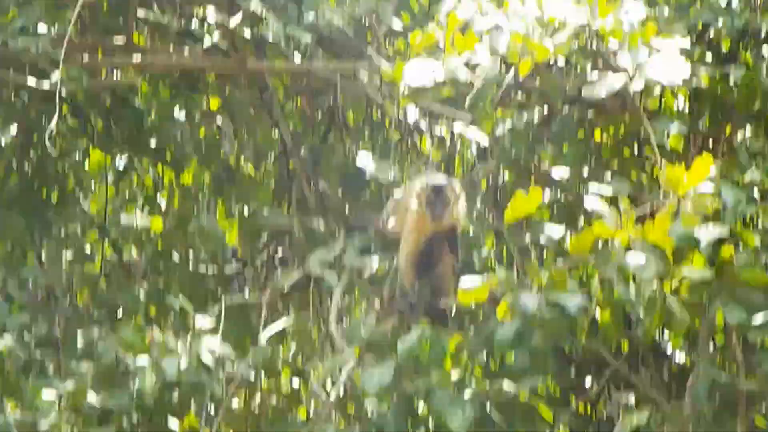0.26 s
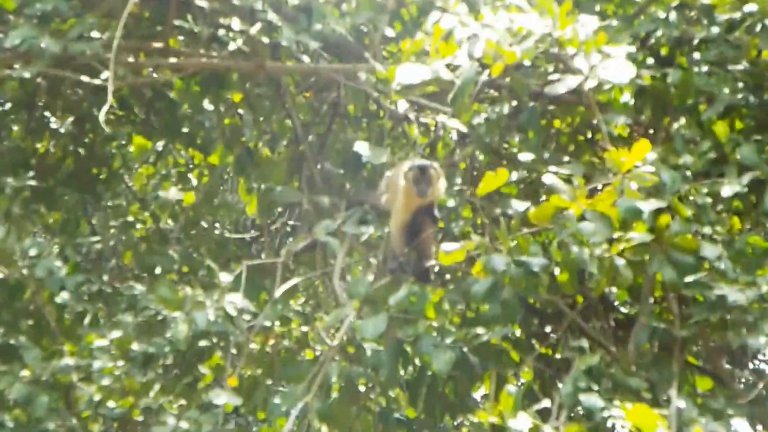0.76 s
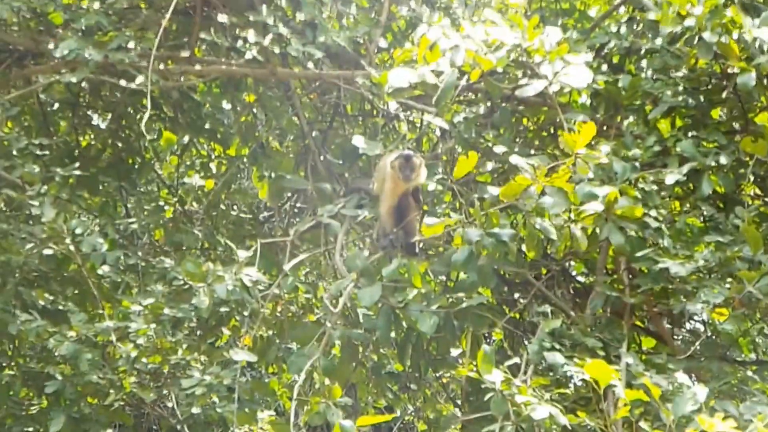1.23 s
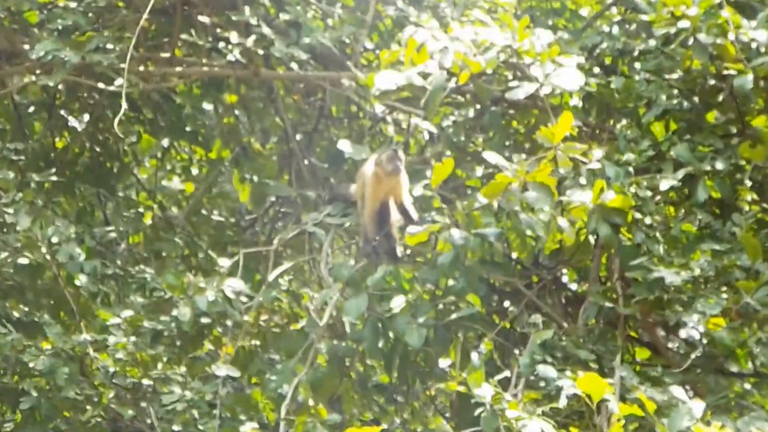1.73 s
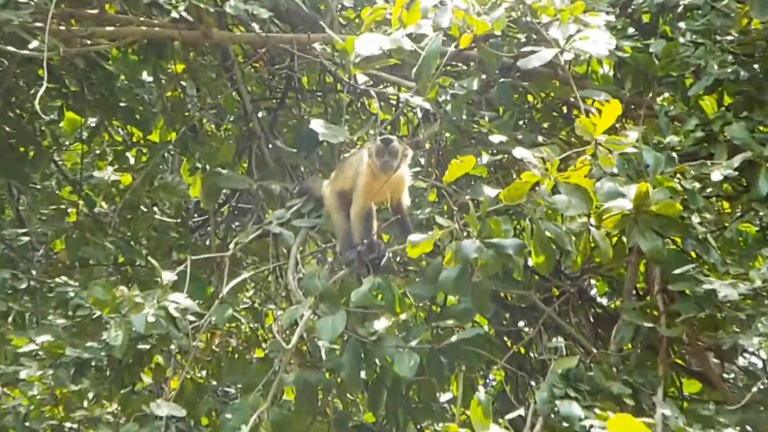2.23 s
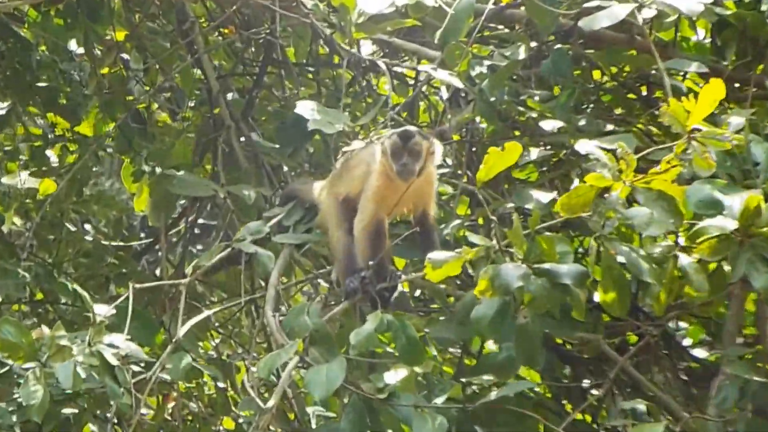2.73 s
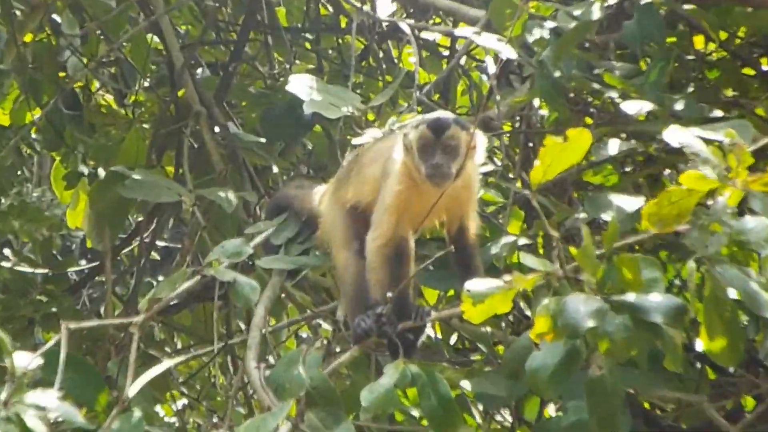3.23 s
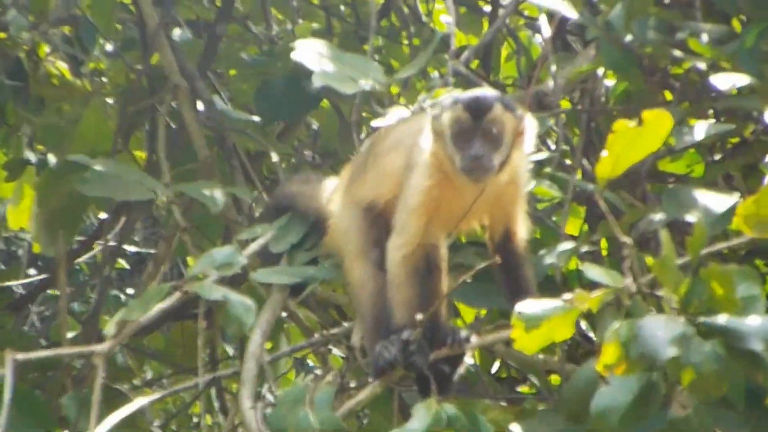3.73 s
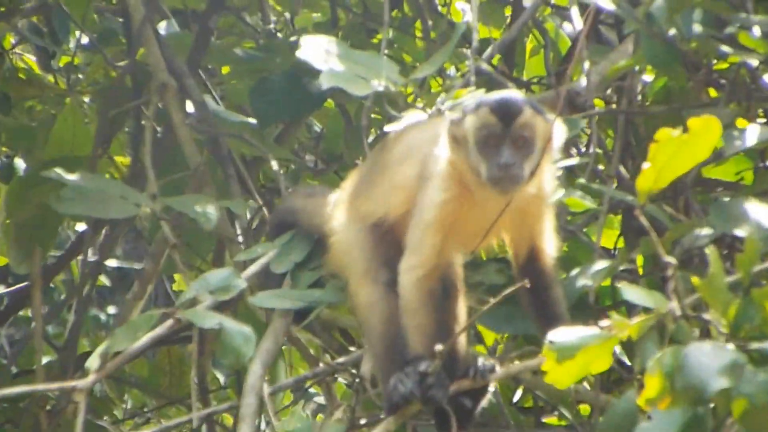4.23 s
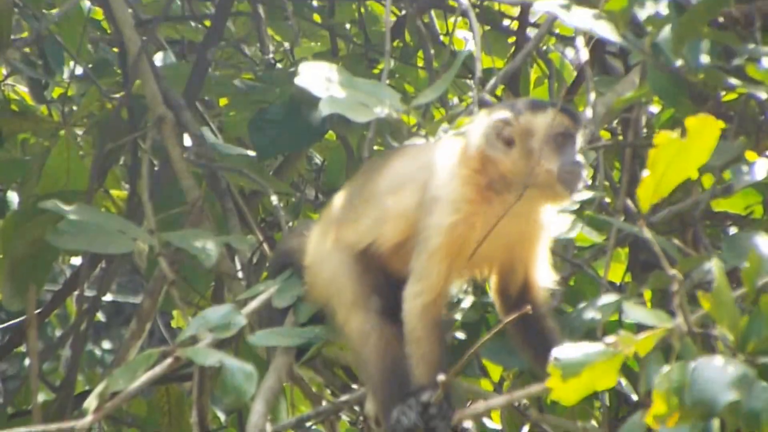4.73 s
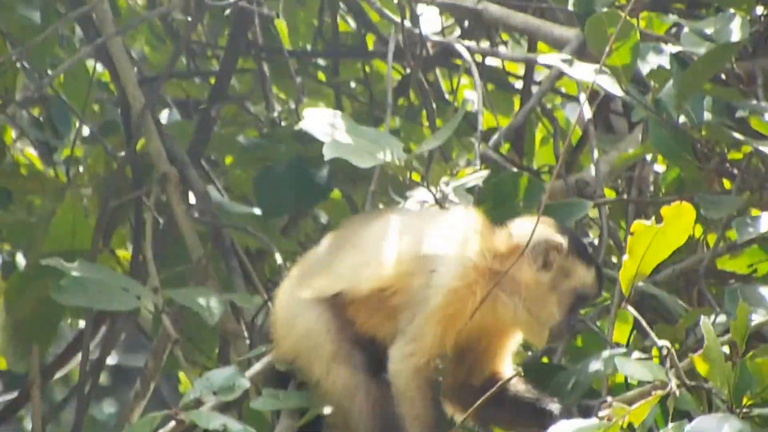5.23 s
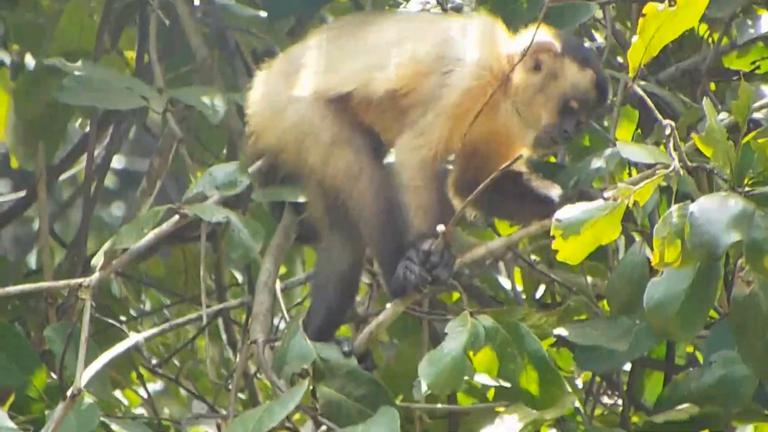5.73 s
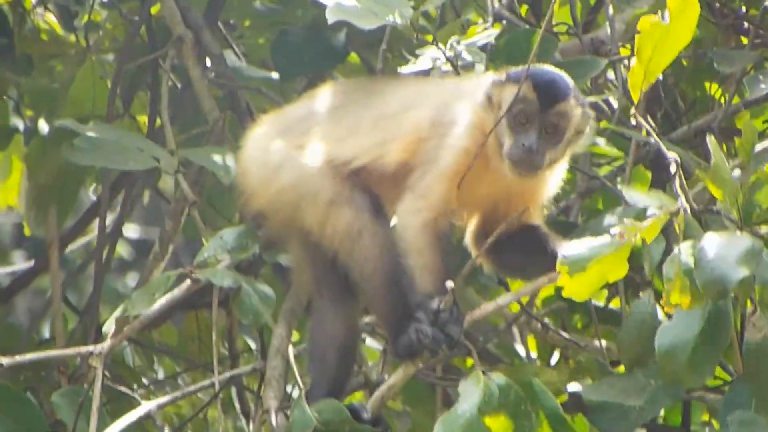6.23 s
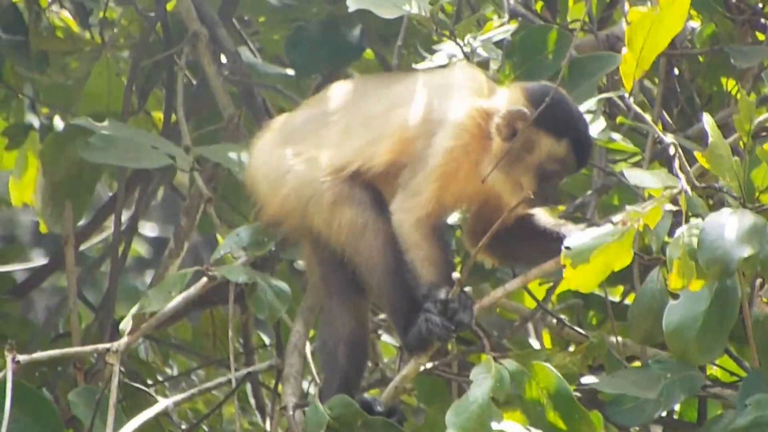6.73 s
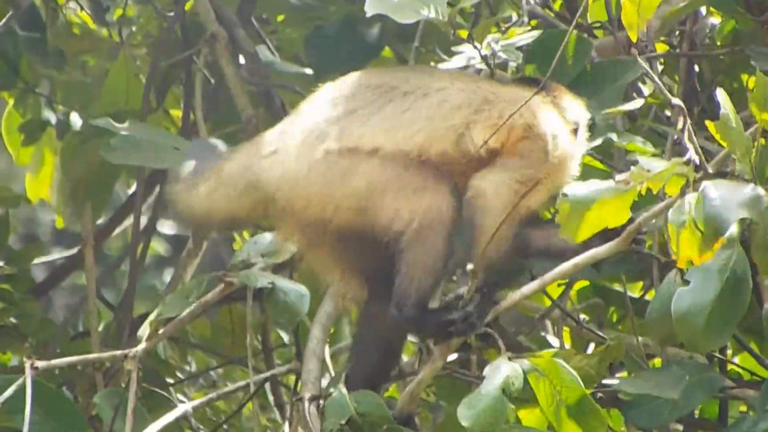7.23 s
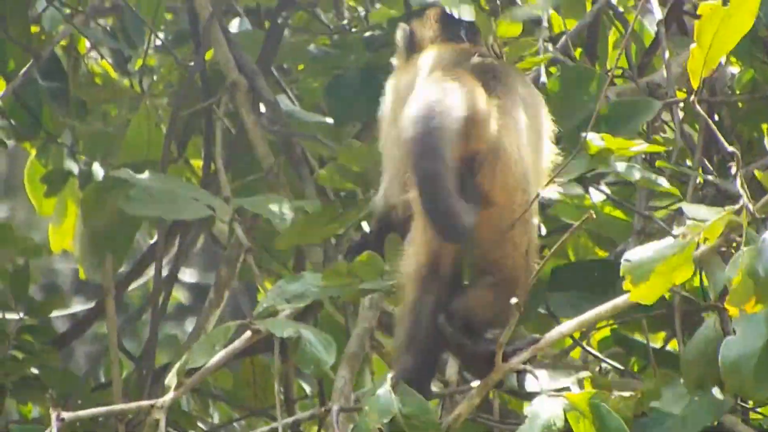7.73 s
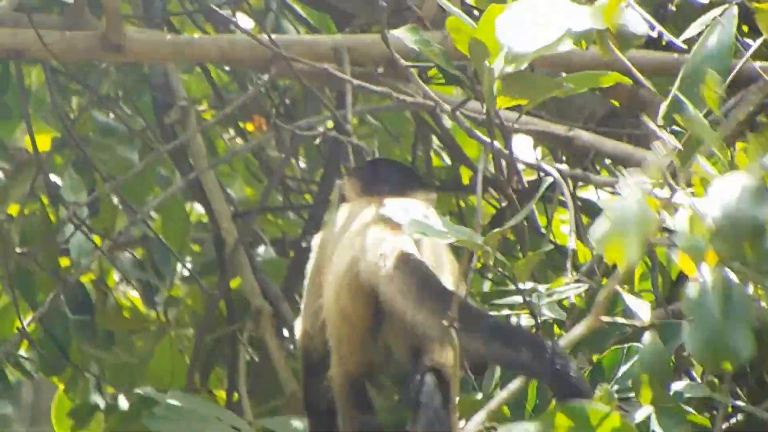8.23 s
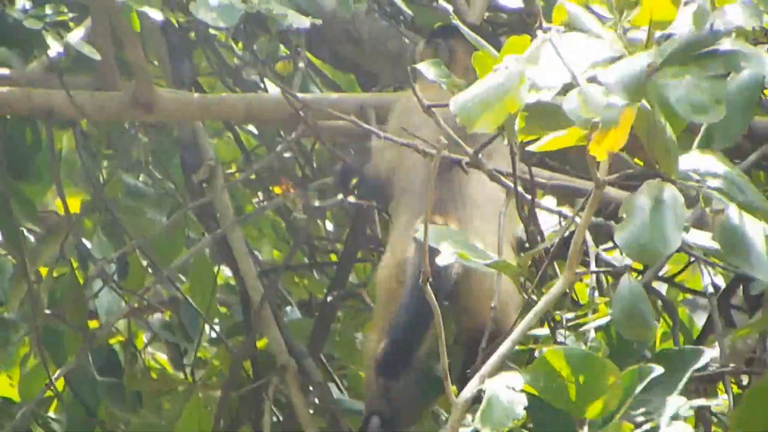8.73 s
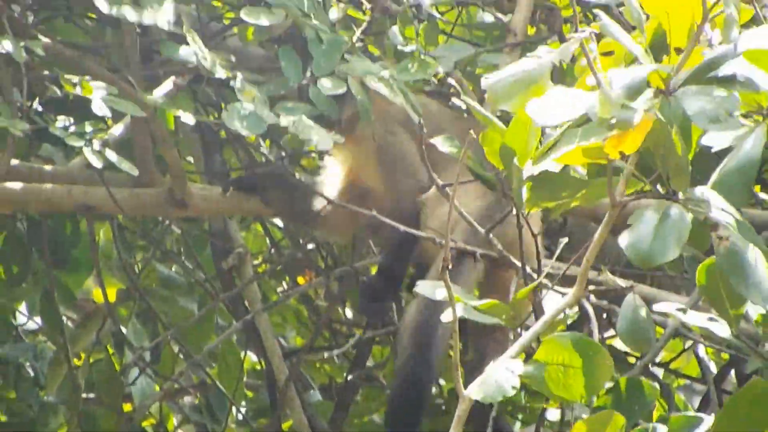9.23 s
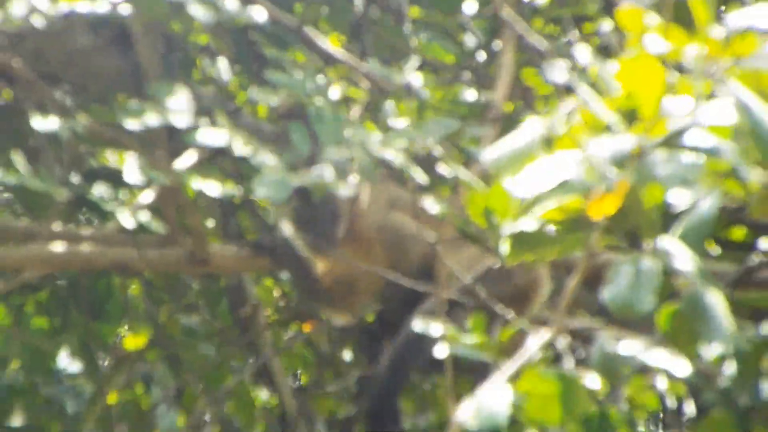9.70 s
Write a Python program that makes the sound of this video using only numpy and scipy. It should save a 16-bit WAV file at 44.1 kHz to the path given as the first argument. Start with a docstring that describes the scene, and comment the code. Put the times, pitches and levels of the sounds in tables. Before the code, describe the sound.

In leafy trees, arching monkey chirps repeat ever faster and shorter while a camera's zoom motor whirs and throbs close to the microphone. A very loud, dry click follows the run. Then brief whoops flick upward, soft peeps scatter, and a thin quavering whistle sinks away. The motor returns at the end. Steady soft leaf and insect noise lies underneath, with natural forest echo.

```python
"""Leafy trees where monkeys call: a quickening run of arching chirps, four rising whoops, a thin held whistle, peeps.
Calls are gliding sines; random echoes scatter them. Shaped noise makes leaves and insects, over a low sine hum.
A camera's zoom motor whirs in bursts: gear-whine sines and throbbing noise. Its controls click: decaying
sine knocks, noise cracks and case ring. A limiter ducks the gain on peaks above full scale."""
import sys
import numpy as np
from scipy import signal
from scipy.fft import rfft, irfft, next_fast_len
from scipy.io import wavfile
from scipy.ndimage import uniform_filter1d, minimum_filter1d, map_coordinates

SR = 44100
rng = np.random.default_rng(int(sys.argv[2]) if len(sys.argv) > 2 else 0)


def transcribe(u):
    """Save the signal u as a 16-bit wav file named by the first command-line argument.

    u: samples, shape (n,) or (channels, n), limited to [-1, 1]; the rate is SR.
    q: integer samples, one column per channel.
    """
    v = np.clip(np.atleast_2d(u).T, -1, 1)
    q = np.round(v * 32767).astype(np.int16)
    wavfile.write(sys.argv[1], SR, q)


N = 439236
TIME = np.arange(N) / SR

# all call levels: before forest gains

# arching chirps: [start t/s, end t/s, top f/Hz, end f/Hz, level/dB], f before scoop and hook
CHIRPS = [(-.22, 0.066, 2680, 2440, -29), (0.417, 0.749, 2690, 2580, -39.5),
          (1.019, 1.364, 2745, 2573, -40.5), (1.564, 1.944, 2806, 2503, -36.5),
          (2.1, 2.452, 2865, 2437, -37.5), (2.595, 2.918, 2895, 2440, -37), (3.035, 3.288, 2906, 2450, -37),
          (3.383, 3.58, 2927, 2424, -37), (3.653, 3.801, 2894, 2475, -35.5),
          (3.882, 4.009, 2880, 2390, -35), (4.095, 4.21, 2875, 2330, -34.5), (4.29, 4.402, 2890, 2270, -35),
          (4.489, 4.596, 2813, 2350, -37)]
SCOOP, SCOOP_S, SAG_POWER, HOOK, HOOK_S = .3, .0078, 1.5, 0.107, 0.0082  # depths: share of pitch
CATCH_AT, CATCH_WIDTH, CATCH_DB = 0.738, 0.12, -9  # place, width: share of chirp
CHIRP_ATTACK_S, CHIRP_RELEASE_S, CHIRP_FADE_DB, OCTAVE_DB = 0.024, 0.021, -4, -12


def chirps(flutter_db=2.5):
    """Pitch scoops up, sags, hooks down; the fundamental fades and catches while the octave holds."""
    out = np.zeros(N)
    for start, end, top_hz, end_hz, db in CHIRPS:
        t = np.arange(0, end - start, 1 / SR)
        u, left = t / t[-1], t[-1] - t
        scoop_s = SCOOP_S * np.sqrt(t[-1] / 0.191)  # short chirps rise faster
        rise = 1 - SCOOP * np.exp(-t / scoop_s)
        hook = 1 - HOOK * np.exp(-left / HOOK_S)
        hz = (top_hz + (end_hz - top_hz) * u ** SAG_POWER) * rise * hook
        turn = phase(hz * (1 + 0.0037 * drift(len(t), 147)))

        catch = np.exp(-((u - CATCH_AT) / CATCH_WIDTH) ** 2)
        edges = np.minimum(t / CHIRP_ATTACK_S, 1) * np.minimum(left / CHIRP_RELEASE_S, 1)
        first = edges * amp(CHIRP_FADE_DB * u + CATCH_DB * catch)
        voice = 0
        for k, gain in enumerate([first, amp(OCTAVE_DB)], 1):
            voice = voice + gain * amp(flutter_db * drift(len(t), 48.0)) * np.sin(k * turn)
        add(out, start, amp(db) * np.sqrt(2) * voice * fade(t, 0.0015))
    return pan(forest(out, direct_db=-3.5, wet_db=-9.5), side_db=1.0)


# rising whoops: [start t/s, end t/s, knee f/Hz, top f/Hz, level/dB]
WHOOP_CALLS = [(5.893, 5.986, 4160, 4660, -29), (7.145, 7.268, 4230, 5080, -26.5),
               (8.032, 8.186, 3900, 5230, -27), (9.254, 9.408, 3900, 5280, -32)]
WHOOP_START_HZ, FLICK_LEAD_S, FLICK_S = 2710, .023, 0.0047  # lead: before the end


def whoops(swell_db=23, swell_power=2.53, octave_db=-38, scoop=0.1387):
    """A soft slow rise breaks at a knee into a loud upward flick."""
    out = np.zeros(N)
    for start, end, knee_hz, top_hz, db in WHOOP_CALLS:
        t = np.arange(0, end - start, 1 / SR)
        u = t / t[-1]
        flick_at = t[-1] - FLICK_LEAD_S
        flick = 1 / (1 + np.exp((flick_at - t) / FLICK_S))
        hz = WHOOP_START_HZ + (knee_hz - WHOOP_START_HZ) * u + (top_hz - knee_hz) * flick
        hz = hz * (1 - scoop * np.exp(-t / 0.01476))
        effort = np.minimum(t / flick_at, 1) ** swell_power
        turn = phase(hz * (1 + 0.0087 * drift(len(t), 409)))
        voice = np.sin(turn) + amp(octave_db) * np.sin(2 * turn)
        add(out, start, amp(db + swell_db * (effort - 1)) * voice * fade(t, .012))
    return forest(out, direct_db=1.5, wet_db=1.5)


WHISTLE_START_S, WHISTLE_END_S, WHISTLE_DB = 7.46, 9.16, -42.5
WHISTLE_HZ, SINK_HZ_PER_S = 6590, 470
OVERSHOOT_HZ, OVERSHOOT_S, DROOP_HZ, DROOP_S = 449, .035, 388, .07


def whistle(rough=.024, quaver=0.0064, quaver_hz=16, octave_db=-31):
    """A thin, quavering, sinking tone, mostly echo; random dips keep catching it below its pitch."""
    t = np.arange(0, WHISTLE_END_S - WHISTLE_START_S, 1 / SR)
    overshoot_hz = OVERSHOOT_HZ * np.exp(-t / OVERSHOOT_S)
    droop_hz = DROOP_HZ * np.exp((t - t[-1]) / DROOP_S)
    hz = WHISTLE_HZ - SINK_HZ_PER_S * t + overshoot_hz - droop_hz
    catches = rough * (.6 - np.maximum(drift(len(t), 350), 0) ** 2)
    waver = catches + quaver * np.sin(2 * np.pi * quaver_hz * t)
    turn = phase(hz * (1 + waver))
    level = amp(WHISTLE_DB) * envelope(t, attack_s=0.047, hold_s=0.79, fall_db_per_s=10) * fade(t, .03)
    out = np.zeros(N)
    add(out, WHISTLE_START_S, level * (np.sin(turn) + amp(octave_db) * np.sin(2 * turn)))
    return pan(forest(out, direct_db=-9.0, wet_db=-2), side_db=-5)


PEEP_BEND_OCT_PER_S = 1.915


def peep(length_s, hz, glide_oct, db):
    """One short gliding sine; longer peeps arch more."""
    u = np.linspace(-1, 1, int(length_s * SR))
    octaves = glide_oct * u / 2 - PEEP_BEND_OCT_PER_S * length_s * u ** 2
    return amp(db) * np.sin(phase(hz * 2 ** octaves)) * np.sqrt(1 - u ** 2)


# near peeps: [t/s, length/s, f/Hz, glide/octaves, level/dB]
NEAR_PEEPS = [(3.217, 0.025, 7830, 0.73, -43), (3.682, .019, 3400, -.25, -49),
              (3.944, 0.041, 3850, 0.5, -47), (4.357, 0.025, 3720, -.22, -47),
              (4.473, 0.015, 8300, .2, -50), (4.476, 0.02, 5860, 0.06, -42), (4.802, 0.075, 4290, .2, -47),
              (4.881, .09, 4370, .08, -46), (7.368, .078, 2260, -0.33, -43.5),
              (7.465, 0.039, 3660, -0.75, -43), (7.47, .05, 8000, -0.3, -55.5),
              (7.473, 0.038, 2030, -0.11, -47), (7.529, 0.021, 3430, -0.42, -46),
              (7.719, 0.024, 5840, 0.1, -38), (7.86, .04, 4280, .03, -44.5),
              (8.462, 0.066, 2034, -0.14, -42.5), (9.355, .072, 2320, -0.04, -43.5)]
# left over right, shared by peeps and wash: [f/Hz, level/dB]
FOREST_BALANCE = [(60, -1.5), (110, -2), (200, 0.5), (380, 2), (700, -1.5), (1290, 2.5), (2380, 3.5),
                  (4400, 1.5), (8120, -7), (15000, 0)]
# far peeps, at random in this stretch
FAR_FROM_S, FAR_TO_S, FAR_HZ, FAR_LENGTH_S, FAR_DB = 4.85, 9.1, 3430, .09, -53


def peeps(count=12, spread_oct=.16, glide_oct=0.204):
    """Near peeps are clear, far ones mostly echo; the highest lean right."""
    near, far = np.zeros((2, N))
    for s, *call in NEAR_PEEPS:
        add(near, s, peep(*call))
    for k, (late, pitch, glide) in enumerate(2 * rng.random((count, 3)) - 1):
        s = FAR_FROM_S + (FAR_TO_S - FAR_FROM_S) * (k + .5 + late / 2) / count
        add(far, s, peep(FAR_LENGTH_S, FAR_HZ * 2 ** (spread_oct * pitch), glide_oct * glide, FAR_DB))
    echoed = forest(near, direct_db=-1.0, wet_db=-2) + forest(far, direct_db=-15, wet_db=-3)
    return balanced(echoed, FOREST_BALANCE)


# scatter decay: [f/Hz, t60/s]
FOREST_T60 = [(500, .7), (2000, 0.41), (4700, 1.0), (6500, 0.76), (15000, 0.47)]


def forest(x, direct_db, wet_db, same=0.86):
    """Direct sound plus sparse random echoes scattered by trunks and leaves, decaying per frequency."""
    taps = rng.standard_normal((2, SR)) * (rng.random(SR) < 3000 / SR)  # 3000 echoes/s
    taps[1] = same * taps[0] + np.sqrt(1 - same ** 2) * taps[1]
    hz, t, z = signal.stft(taps, SR, nperseg=256)
    near_leaves = 1 + 1.1 * np.exp(-t / 0.011)  # answer first
    decay = amp(-60 * t / read(FOREST_T60, hz)[:, None]) * near_leaves
    tail = signal.istft(z * decay, SR, nperseg=256)[1]
    wet = signal.fftconvolve(x[None], tail / np.linalg.norm(tail[0]), axes=1)[:, :N]
    return amp(direct_db) * x + amp(wet_db) * wet


# zoom runs: [start t/s, end t/s, motor f/Hz, gear turns per s, level/dB, direction 0 out 1 in]
ZOOM_RUNS = [(0.295, 1.163, 364.7, 18, -41, 0), (1.229, 1.434, 366.7, 20, -41, 1),
             (1.794, 3.902, 367.8, 18.5, -41, 1), (9.298, 9.999, 366, 19.8, -41.5, 0)]
# whine partials: [multiple of motor f, level/dB out, level/dB in], before load swing
GEAR_WHINE = [(4.15, -14, -2), (6, -13, -16), (7, -8, -18), (8, -6, -15), (9.75, -15, -2.5), (11, -10, -16),
              (11.8, -2.5, -14), (13, -12, -19)]
# relative gear noise spectra, zooming out and in: [f/Hz, level/dB per Hz]
GEAR_NOISE_OUT = [(100, -55), (220, -28), (360, -13), (800, -1), (1150, -7), (1550, 0), (2000, -4.5),
                  (3300, -11), (4400, 3), (5800, -17), (10800, -29.5), (15000, -48)]
GEAR_NOISE_IN = [(100, -60), (220, -28.5), (500, -17.5), (900, -4), (1200, -7), (1550, 0), (2000, -5),
                 (3000, -7.5), (4400, -1), (5700, -16.5), (10800, -34), (15000, -42)]
# camera case modes, shared with the clicks: [f/Hz, width/Hz, lift/dB]
CASE_MODES = [(822, 36, 6.5), (1530, 150, 4), (3640, 245, 5.5), (4360, 290, 1), (7150, 220, 6),
              (8830, 470, 5.5), (10800, 400, 7)]
WOBBLE, JITTER, LOAD_DB = .06, .007, 4.5  # first two: share of motor speed


def zoom_motor(throb_db=1, grind_db=-2.0):
    """A gear binds once a turn: the whine sags, swells as it pulls free, and gear noise throbs."""
    out = np.zeros((2, N))
    for start, end, motor_hz, turns_per_s, db, inward in ZOOM_RUNS:
        t = np.arange(0, end - start, 1 / SR)
        inward = int(inward > .5)
        gear = phase(turns_per_s * (1 + 0.0295 * drift(len(t), 7.89)))
        bind = np.cos(gear) - .2 * np.cos(2 * gear) + .2 * np.sin(2 * gear)
        load_db = LOAD_DB * (np.cos(gear - 1.1) - .6)
        shaft = phase(motor_hz * (1 - WOBBLE * bind + JITTER * drift(len(t), 350)))
        whine = 0
        for k, *levels in GEAR_WHINE:
            whine = whine + amp(levels[inward] + load_db + 2.0 * drift(len(t), 90)) * np.sin(k * shaft)
        throb = amp(grind_db + throb_db * np.sin(gear + 0.11) + 0.59 * drift(len(t), 200))
        grind = noise(len(t), [GEAR_NOISE_OUT, GEAR_NOISE_IN][inward], CASE_MODES) * throb
        add(out, start, amp(db) * (whine + grind) * fade(t, 0.0059))
    # left over right: f/Hz, level/dB
    return balanced(out, [(300, 1), (800, -0.5), (1400, 11.0), (2500, 12.5), (4400, 4.5), (8000, -4.0),
                          (15000, -11)])


# camera controls: [t/s, level/dB, f/Hz, decay/s], level before the mix of knock, crack and ring
CONTROL_CLICKS = [(.067, -6.5, 1530, 0.0014), (.26, 4, 1860, 0.0008), (0.3157, -17, 1455, 0.0039),
                  (0.3229, -22, 1600, .0045), (.399, -30, 995, .008), (.925, -27, 1620, 0.0036),
                  (1.155, -24, 1470, 0.0021), (1.1825, -9.5, 1350, .0024), (1.231, -23, 1520, 0.0029),
                  (1.253, -21, 1560, 0.0041), (1.257, -33.5, 686, 0.012), (1.33, -32.5, 810, 0.0058),
                  (1.366, -25, 1460, 0.0029), (4.038, -36, 1070, 0.0044), (4.191, -34.5, 1560, 0.0034),
                  (4.5901, 21.5, 1955, 0.00092), (4.77, -34, 1180, 0.0039), (5.159, -34, 1430, 0.003),
                  (5.821, -31, 1380, 0.0038), (7.83, -36.5, 1040, 0.0035), (7.921, -30, 1080, 0.0027),
                  (9.299, -29.5, 1590, 0.0035), (9.326, -25.5, 1510, 0.0049), (9.39, -29.5, 1430, 0.007),
                  (9.6398, -18.5, 1446, 0.0021), (9.7361, -17.5, 1630, 0.0018)]
# relative spectra of crack and case ring: [f/Hz, level/dB per Hz]
CRACK_SPECTRUM = [(60, -53), (500, -36), (2500, 10), (5000, 8.5), (9000, -11), (12000, -13), (15000, -23)]
RING_SPECTRUM = [(40, -43), (200, -33), (500, -11), (1000, 0), (1500, 5), (2400, -5.5), (5000, -17),
                 (15000, -58)]
# at 1 ms decay, then per octave of decay
CRACK_DB, CRACK_DB_PER_OCT, RING_DB, RING_DB_PER_OCT, RING_MAX_DB = -7.5, -5.5, -25.5, 11, 1.5
# random ticks of the hand on the case
TICKS_PER_S, TICK_DB, TICK_SPREAD_DB, TICK_HZ, TICK_DECAY_S = 2.5, -42.5, 1.5, 1287, 0.0041


def clicks(crack_s=0.00049, ring_s=0.0056, knock_side_db=7.5):
    """Crack, short plastic knock and case ring; quicker clicks crack more and ring less."""
    out, t = np.zeros((2, N)), np.arange(4096) / SR
    ticks = []
    for k, (late, force, pitch) in enumerate(rng.random((int(TICKS_PER_S * N / SR), 3))):
        tick_db = TICK_DB + TICK_SPREAD_DB * (2 * force - 1)
        ticks.append(((k + late) / TICKS_PER_S, tick_db, TICK_HZ * 2 ** (pitch - .5), TICK_DECAY_S))
    for s, db, hz, decay_s in [*CONTROL_CLICKS, *ticks]:
        softness_oct = np.log2(decay_s / .001)
        knock = np.sin(2 * np.pi * hz * t) * np.exp(-t / decay_s) * (1 - np.exp(-t / 0.00039))
        crack_db = CRACK_DB + CRACK_DB_PER_OCT * softness_oct
        crack = amp(crack_db) * noise(len(t), CRACK_SPECTRUM) * np.exp(-t / crack_s)
        ring_db = min(RING_DB + RING_DB_PER_OCT * softness_oct, RING_MAX_DB)
        ring = amp(ring_db) * noise(len(t), RING_SPECTRUM, CASE_MODES) * np.exp(-t / ring_s) * fade(t, 0.0015)
        add(out, s, amp(db) * (pan(knock + ring, knock_side_db) + crack))
    return signal.sosfilt(signal.butter(2, 450, "high", fs=SR, output="sos"), out)  # a small case has no bass


# relative spectra of hiss and leaf brush: [f/Hz, level/dB]
HISS_SPECTRUM = [(500, -5), (2000, -1.5), (4500, 5.5), (6500, -1), (10000, -7.5), (15000, -21)]
LEAF_SPECTRUM = [(2000, -27), (4500, 6), (6000, -1), (8000, 3), (9500, -5), (12000, -6), (15500, -22)]
HISS_START_S, HISS_ATTACK_S, HISS_HOLD_S, HISS_FALL_DB_PER_S, HISS_DB = 4.66, 0.25, 0.42, 18.5, -50.5
LEAVES_START_S, LEAVES_ATTACK_S, LEAVES_HOLD_S, LEAVES_FALL_DB_PER_S, LEAVES_DB = 2.41, 0.099, .003, 800, -42.5


def foliage():
    """A long swell of hiss, and a quick brush of leaves on the right."""
    t = np.arange(2 * SR) / SR
    swell = amp(HISS_DB) * envelope(t, HISS_ATTACK_S, HISS_HOLD_S, HISS_FALL_DB_PER_S)
    brush = amp(LEAVES_DB) * envelope(t, LEAVES_ATTACK_S, LEAVES_HOLD_S, LEAVES_FALL_DB_PER_S)
    hiss = rustle(HISS_START_S, swell, HISS_SPECTRUM, grain_db=1.1)
    leaves = rustle(LEAVES_START_S, brush, LEAF_SPECTRUM, grain_db=2.0)
    return hiss + pan(leaves, side_db=-10)


def rustle(start_s, level, colour, grain_db):
    """Shaped noise under a level curve, with random grain."""
    out = np.zeros((2, N))
    add(out, start_s, noise(len(level), colour) * level * amp(grain_db * drift(len(level), 300)))
    return out


# relative wash spectrum: [f/Hz, level/dB per Hz]
WASH_SPECTRUM = [(60, -22), (130, -12.5), (230, -9), (450, -4), (800, -1), (1300, -1.5), (2400, -9),
                 (3500, -7), (4700, -7), (5700, -14.5), (7500, -18.5), (11000, -24), (15800, -27.5)]
# wash resonances: [f/Hz, width/Hz, lift/dB]
WASH_RESONANCES = [(433, 32, 5), (810, 29, 4), (1081, 29, 9.5), (1228, 24, 5.5), (1515, 104, 4),
                   (4480, 670, 4)]
# low hum: [f/Hz, rms level/dB], after the step
HUM_TONES = [(60, -69), (119, -78.5), (149.5, -79.5), (30, -80.5)]
WASH_DB = -49


def background(early_db=-2.0):
    """Noise for leaves and far insects plus sine hum; both step up slightly at 4.4-4.8 s."""
    step_db = np.interp(TIME, [4.4, 4.8], [early_db, 0])
    level_db = WASH_DB + step_db + .5 * drift(N, 11)
    wash = balanced(noise(N, WASH_SPECTRUM, WASH_RESONANCES), FOREST_BALANCE) * amp(level_db)
    hum = sum(amp(db) * np.sqrt(2) * np.sin(2 * np.pi * hz * TIME) for hz, db in HUM_TONES)
    return wash + hum * amp(step_db)


# left-right likeness of noise: [f/Hz, correlation]
NOISE_LIKENESS = [(60, 0.88), (500, 1), (2000, 0.81), (5000, 0.8), (15000, 0.37)]


def noise(size, colour, peaks=()):
    """Unit-rms stereo noise with a spectrum and resonances, partly alike in both channels."""
    length = next_fast_len(size)
    hz = np.fft.rfftfreq(length, 1 / SR)
    a, b = rfft(rng.standard_normal((2, length)))
    same = np.clip(read(NOISE_LIKENESS, hz), 0, 1)
    right = same * a + np.sqrt(1 - same ** 2) * b
    db = read(colour, hz) + sum(lift * np.exp(-((hz - f) / width) ** 2) for f, width, lift in peaks)
    return unit(irfft(np.array([a, right]) * amp(db), length)[:, :size])


def amp(db):
    """Decibels to amplitude."""
    return 10 ** (np.asarray(db) / 20)


def unit(x):
    """Scales to unit rms."""
    return x / np.sqrt(np.mean(x ** 2) + 1e-20)


def read(points, hz):
    """Joins points by straight lines over log frequency."""
    f, value = np.transpose(points)
    return np.interp(np.log(hz + 1), np.log(f + 1), value)


def add(mix, s, sound):
    """Lays a sound into the mix at s seconds, cropping overhang."""
    at = round(s * SR)
    sound = sound[..., max(-at, 0):]
    part = mix[..., max(at, 0):][..., :sound.shape[-1]]
    part += sound[..., :part.shape[-1]]


def pan(x, side_db):
    """Level split, left over right."""
    return x * amp([[side_db / 2], [-side_db / 2]])


def balanced(x, balance):
    """Leans each frequency to the left or right."""
    size = next_fast_len(N)
    side_db = read(balance, np.fft.rfftfreq(size, 1 / SR))
    return irfft(rfft(x, size) * amp([side_db / 2, -side_db / 2]), size)[:, :N]


def phase(hz):
    """Integrates frequency to radians."""
    return 2 * np.pi * np.cumsum(hz) / SR


def fade(t, edge_s):
    """Linear start and stop."""
    return np.clip(np.minimum(t - t[0], t[-1] - t) / edge_s, 0, 1)


def envelope(t, attack_s, hold_s, fall_db_per_s):
    """Swells, holds, then dies away."""
    return np.clip(t / attack_s, 0, 1) ** 2 * amp(-fall_db_per_s * np.maximum(t - attack_s - hold_s, 0))


def drift(size, rate_hz):
    """Smooth random curve through about unit-size points, rate_hz points a second."""
    at = np.arange(size) * rate_hz / SR
    return map_coordinates(rng.standard_normal(4096), [at], order=3, mode="wrap")


# left port's phase lead: [f/Hz, lead/rad]
PORT_LEAD = [(0, 0.29), (1500, -0.27), (3500, -0.71), (4700, -1.05), (6300, -1.65), (9000, -0.85),
             (16000, -0.65)]


def ports(x):
    """Sound reaches the two microphone ports slightly out of step."""
    size = next_fast_len(N)
    lead = read(PORT_LEAD, np.fft.rfftfreq(size, 1 / SR))
    return irfft(rfft(x, size) * np.exp(1j * np.array([lead, -lead]) / 2), size)[:, :N]


def scene():
    """Sums all sources at the two ports."""
    calls = chirps() + whoops() + whistle() + peeps()
    return ports(calls + zoom_motor() + clicks() + foliage() + background())


EDGE_HZ = 15850


def record(dry):
    """A limiter ducks peaks above full scale, holds and recovers; then a low-pass limits the band."""
    hold_samples, attack_samples, recover_db_per_s = 1100, 66, 220
    peak_db = 20 * np.log10(abs(dry).max(0) + 1e-9)
    held_db = -minimum_filter1d(-peak_db, hold_samples, origin=hold_samples // 2 - 1)
    fall_db = TIME * recover_db_per_s
    over_db = np.maximum(np.maximum.accumulate(held_db + fall_db) - fall_db, 0)
    duck_db = -uniform_filter1d(over_db, attack_samples, origin=-attack_samples // 4)
    ducked = np.clip(dry * amp(duck_db), -1, 1)
    low_pass = signal.firwin(511, EDGE_HZ, window=("kaiser", 9), fs=SR)
    return signal.oaconvolve(ducked, low_pass[None], "same")


dry = scene()
out = record(dry)
transcribe(out)
```